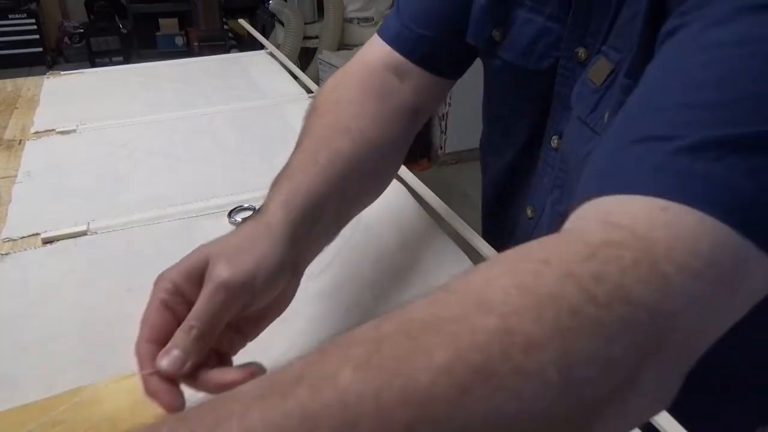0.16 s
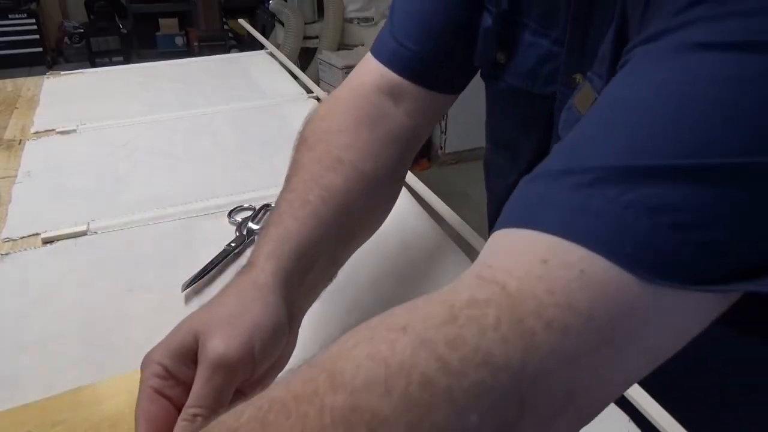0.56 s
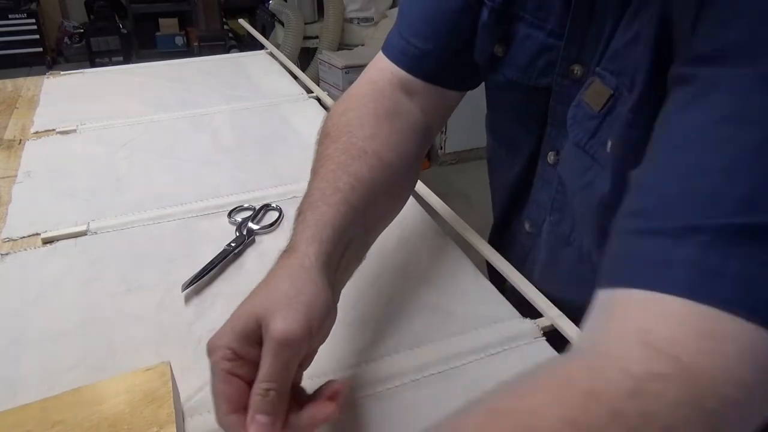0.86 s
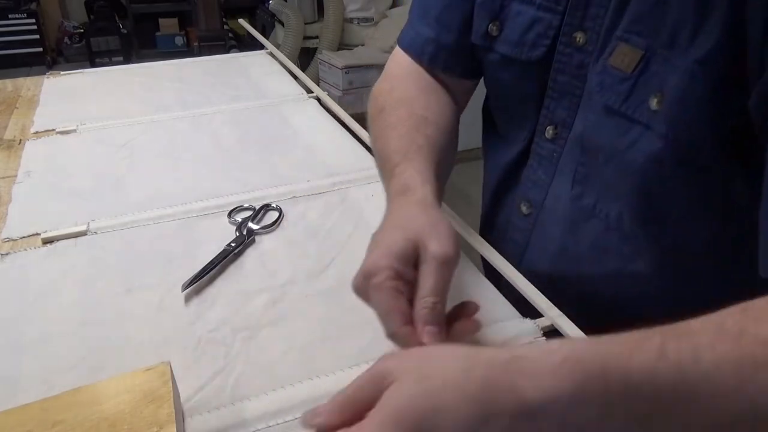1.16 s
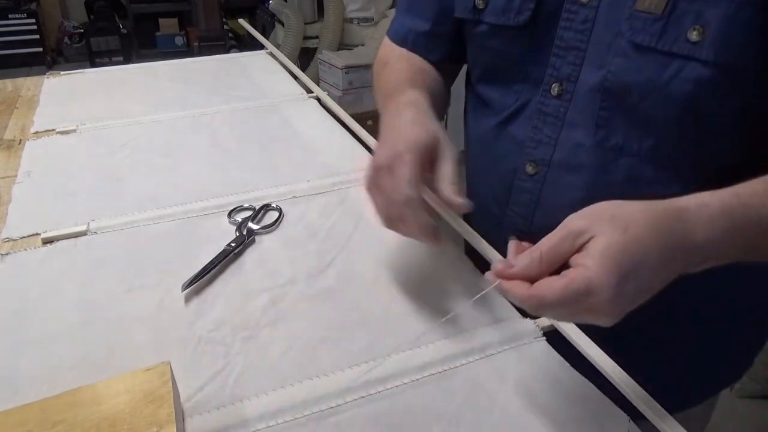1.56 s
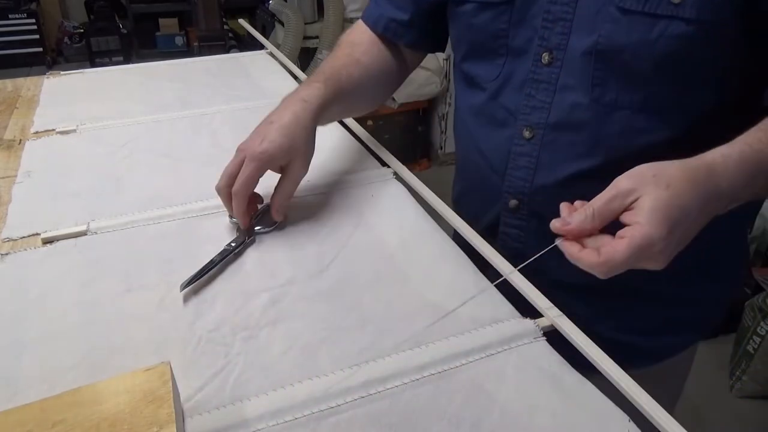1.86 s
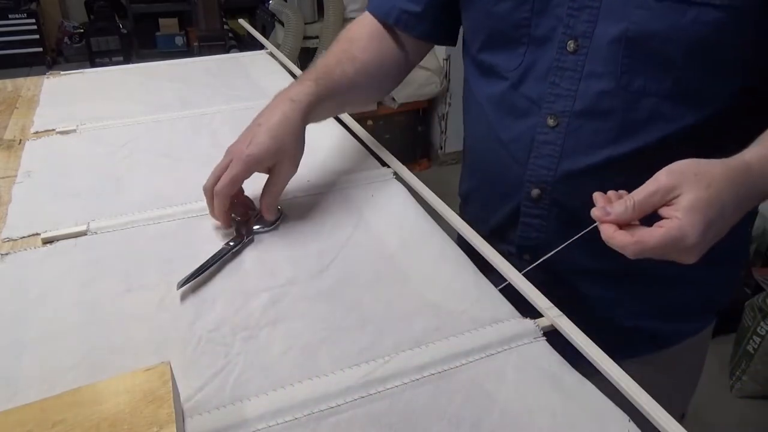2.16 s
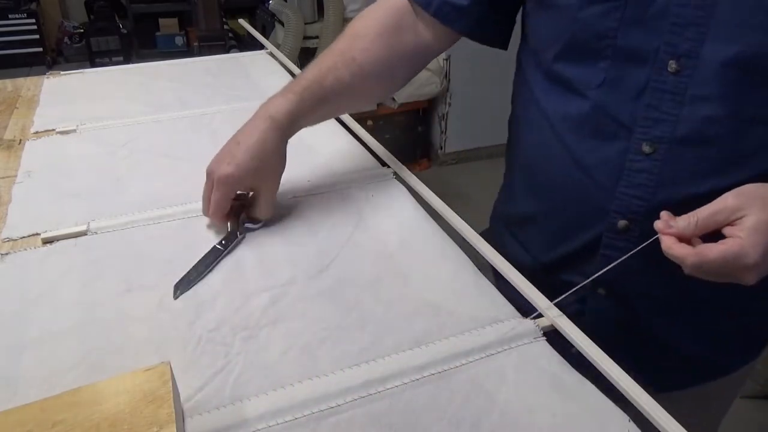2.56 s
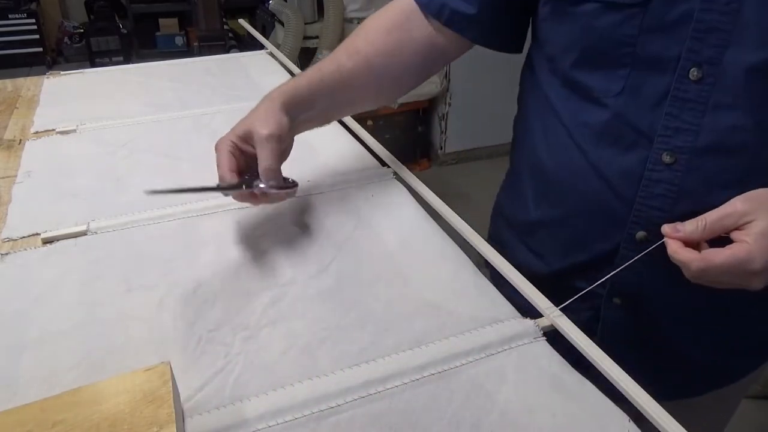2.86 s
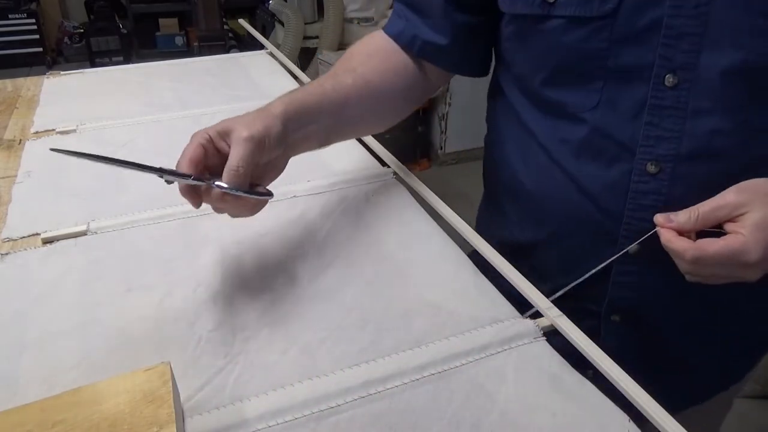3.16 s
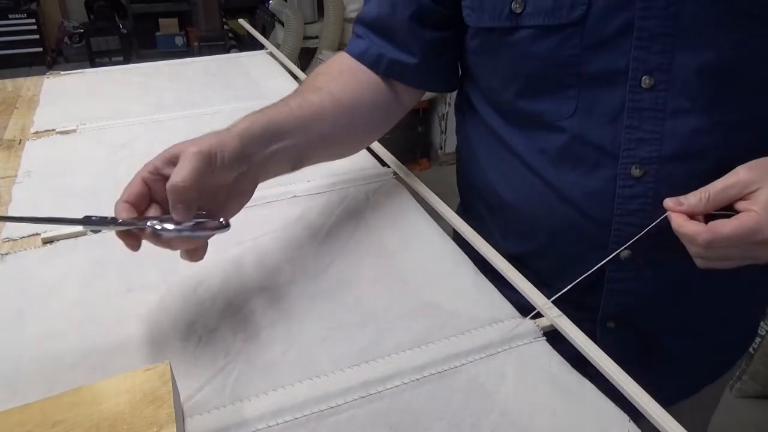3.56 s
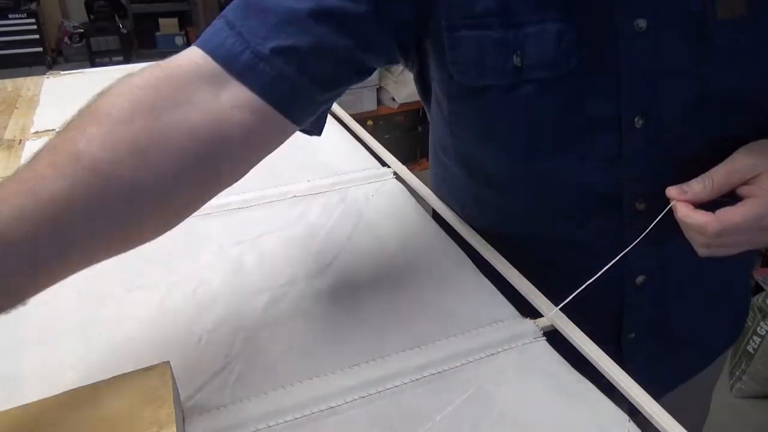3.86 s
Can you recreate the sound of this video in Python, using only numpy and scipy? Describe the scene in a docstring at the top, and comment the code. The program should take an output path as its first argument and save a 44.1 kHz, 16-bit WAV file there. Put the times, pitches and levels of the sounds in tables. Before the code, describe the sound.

Close hand sewing on tightly stretched cloth: thread hisses and rasps, fingers tap the drumlike surface, and scissors clink once.

```python
"""A quiet workshop, with a stereo microphone close to fabric stretched drum-tight over a wooden frame.
Someone is sewing by hand: thread hisses through the weave, ticks where it catches and rasps when pulled.
Fingers and thread bump and rub the taut skin of cloth, which booms like a loose drum.
A sleeve rustles and steel scissors clink as they are picked up.
Faint room noise and a thin electronic buzz lie underneath."""
import sys
import numpy as np
from scipy import signal
from scipy.fft import rfft, irfft
from scipy.io import wavfile

SR = 44100
rng = np.random.default_rng(int(sys.argv[2]) if len(sys.argv) > 2 else 0)


def unload_audio(sound):
    """Save the sound as a 16-bit wav file, at the path given as the first command line argument."""
    columns = np.transpose(np.atleast_2d(sound))
    # keep every value between -1 and 1, then stretch to whole-number steps
    steps = np.round(np.clip(columns, -1, 1) * 32767)
    wavfile.write(sys.argv[1], SR, steps.astype(np.int16))


N = 177590
TIME = np.arange(N) / SR
FREQS = np.maximum(np.arange(N + 1) * SR / (2 * N), 1)

# Fingers and thread bumping the skin. Each row: start in seconds, relative level in dB, contact resonance
# in Hz, contact damping from 0 to 1, crack level in dB, ring against the first wave in dB.
BUMPS = [(0.381, -43.5, 1030, 0.4, -50, 13), (0.386, -38, 440, 0.66, -77, 6.5),
         (0.48, -50, 450, 0.5, -60, 15), (0.6900, -35.5, 769, 0.01, -40.5, 7),
         (0.6912, -26.5, 286, 0.2, -55, -9), (0.715, -22.5, 1184, 0.05, -36, -2),
         (0.718, -30, 2420, 0.06, -65, 0), (0.7245, -24, 584, 0.55, -69, -4.5),
         (0.727, -26, 1680, 0.2, -52, -3), (0.735, -25.5, 320, 0.3, -65, 2),
         (0.741, -23.5, 665, 0.27, -64, -1), (0.753, -22, 1064, 0.5, -69, -2),
         (0.802, -30.5, 1050, 0.7, -75, -2), (0.988, -35, 470, 0.3, -71, -9),
         (1.143, -38, 798, 0.26, -73, 1), (1.1938, -36, 1920, 0.4, -48, -10.5),
         (1.246, -42.5, 396.8, 0.16, -65, 1), (1.256, -46, 180, 0.32, -78, -0.5),
         (1.280, -32.5, 980, 0.2, -65, -4), (1.305, -35, 1000, 0.27, -61, -2),
         (1.419, -38, 1180, 0.41, -63, 3), (1.748, -49, 342, .44, -82.5, 1),
         (1.8415, -41.5, 1370, .44, -50, -1), (1.858, -44, 909.9, .44, -55, -3),
         (1.868, -43, 338, 0.3, -80, 4), (1.956, -31, 760, 0.38, -69, 4), (1.96, -39, 313, 0.16, -80, -0.5),
         (1.982, -40, 640.1, 0.06, -75, 5), (2.037, -52, 190, 0.55, -67.5, 5.5),
         (2.096, -26, 1280, 0.55, -42, 4), (2.119, -32, 633, 0.57, -90, 5),
         (2.3889, -34.5, 1091, 0.13, -81, 2.5), (2.579, -42.5, 199, 0.23, -76, -6.5),
         (2.580, -32, 517, 0.4, -73, -3), (2.585, -37.5, 805, 0.03, -78, -6),
         (2.621, -36.5, 440, 0.3, -74, -2.5), (2.655, -42, 392, 0.32, -80, -3),
         (2.958, -62.5, 736.9, 0.59, -65.5, 10.5), (3.338, -56.5, 915.7, .44, -81, -3),
         (3.945, -61, 1010, 0.19, -68, 0), (3.961, -59, 1420, 0.36, -66.5, -6)]
# Colour of the taut cloth. Each row: frequency in Hz, relative level in dB.
SKIN_COLOUR = [(30, -78.5), (115, -24), (155, -30), (200, -14), (230, -14), (275, -4), (400, -1.5),
               (620, 5), (770, -4.5), (930, 4), (1230, 0.5), (1850, -13.5), (2400, -10.5), (3100, -19),
               (15000, -50)]


def skin_bumps(scatter_db, low_share, delay_cycles, knee_hz):
    """A bump sends a wave over the skin, lows arriving last; returns from the frame build the ring."""
    out = np.zeros((2, N))
    rings = [rfft(skin_ring(t60=0.37, dense_t60=0.49, dense_db=-1), 2 * N) for _ in range(3)]
    # seams and hands scatter the wave within milliseconds
    scatters = [rfft(unit_energy(widen(white()) * decay(0.062)), 2 * N) for _ in range(3)]
    wave = rms_one(shape(SKIN_COLOUR))
    # above the knee, each frequency arrives delay_cycles of its own cycles late
    delay = np.exp(-2j * np.pi * delay_cycles * np.log(FREQS + knee_hz))
    for k, (s, db, contact_hz, damping, _, ring_db) in enumerate(BUMPS):
        # the finger is a mass on a spring that favours its own frequency; a light snap moves less bass
        contact = 1 / (1 - (FREQS / contact_hz) ** 2 + 1j * damping * FREQS / contact_hz)
        travel = contact * delay / (1 - 1j * low_share * contact_hz / FREQS) ** 2
        peak = np.abs(irfft(wave * travel)).max()
        returns = from_db(scatter_db) * wave * scatters[k % 3] + from_db(ring_db) * rings[k % 3]
        bump = irfft((wave + returns) * travel) / peak
        start = int(s * SR)
        out[:, start:] += from_db(db - 3.5) * bump[:, :N - start]
    return out


def skin_ring(t60, dense_t60, dense_db):
    """The skin rings in clear modes, struck differently at each spot, over a mass of crowded ones."""
    # Each row: frequency in Hz, relative level in dB.
    skin_modes = [(156, -9), (187, -8.5), (201, -3.5), (291, -2), (318, -2), (388, -4), (421, 0), (445, 1),
                  (468, 5.5), (512, 6), (564, -1.5), (615, 2), (660, 3), (845, -3.5), (906, 4), (960, -7),
                  (994, -9), (1035, -12), (1075, 1.5), (1117, 1.5), (1194, -2.5), (1264, 0), (1575, -9),
                  (1650, -8.5), (1725, -9.5), (2350, -14)]
    modes = np.zeros((2, N))
    for hz, db in skin_modes:
        strength = from_db(db + 1.5 * rng.standard_normal())
        modes[:, :SR] += strength * np.sin(2 * np.pi * (hz * TIME[:SR] + rng.random((2, 1))))
    clear = unit_energy(widen(modes * decay(t60)))
    dense = unit_energy(noise(SKIN_COLOUR) * decay(dense_t60))
    ring = (clear + from_db(dense_db) * dense) * (1 - np.exp(-TIME / 0.0011))
    # open on both sides, the cloth radiates no deep bass
    return unit_energy(signal.sosfilt(signal.butter(3, 140, "high", fs=SR, output="sos"), ring))


def contact_cracks(crack_t60, tail_db, tail_t60):
    """Nail and thread give each bump a short bright crack, which dies away in the room."""
    # Each row: frequency in Hz, relative level in dB.
    crack_colour = [(100, -49.5), (500, 19), (1500, 16.5), (3000, 10), (6000, 0), (9000, -2.5),
                    (15500, -20.5)]
    hits = clicks([(s, crack_db) for s, _, _, _, crack_db, _ in BUMPS])
    fade = decay(crack_t60) + from_db(tail_db) * decay(tail_t60)
    return convolve(hits, fade) * noise(crack_colour)


def thread_drag(split_hz, bright_hz, sing_db, sing_from_db):
    """Slips along the weave make the skin boom and rasp and the thread hiss; under a hard pull it sings."""
    # Hiss of the weave. Each row: frequency in Hz, relative level in dB.
    weave_colour = [(100, -35), (1500, -6.5), (3000, -0.5), (4500, 1), (7000, 1), (8500, 1.5), (10000, -.5),
                    (12000, -2), (14000, -3), (15500, -10)]
    # Resonances of the taut thread. Each row: frequency in Hz, width in Hz, relative level in dB.
    thread_modes = [(2460, 220, -8), (2560, 88, -1), (3920, 86, 1.5), (5820, 240, -6), (8200, 400, -18.5)]
    boom, rasp, hiss = pull_gains()
    jerks = slips(per_s=700, spread_db=2)
    body = travelling_ring(jerks[0], spot_change_s=0.1906)
    body += from_db(-4.5) * rms_one(filtered(jerks[0], shape(SKIN_COLOUR)))
    body = tension_waver(body, depth=0.011, per_s=7)
    low = filtered(body, 1 / (1 + (FREQS / split_hz) ** 8))
    # now and then a single fibre snags and lets go with a tiny scratch
    snags = np.abs(convolve(slips(per_s=70, spread_db=2)[0], decay(0.006)))
    rustle = jerks + white() * (from_db(2.5) + from_db(-13) * rms_one(snags))
    fibres = rms_one(widen(filtered(rustle, shape(weave_colour))))
    # a faster pull is brighter as well as louder
    top = filtered(fibres, 1 / (1 + (bright_hz / FREQS) ** 8))
    fibres += top * (np.sqrt(hiss / from_db(-40)) - 1)
    sing = rms_one(widen(filtered(rustle, resonances(thread_modes))))
    sing = tension_waver(sing, depth=0.02, per_s=6)
    sing /= 1 + (from_db(sing_from_db) / (rasp + 1e-9)) ** 2
    booming = from_db(-2.5) * boom * rms_one(low)
    rasping = rasp * (from_db(-0.1) * rms_one(body - low) + from_db(sing_db) * sing)
    return judder(depth_db=2, per_s=65) * (booming + rasping) + from_db(-2) * hiss * fibres


def pull_gains(taut_s=0.725, slack_s=2.18, attack_s=0.007, boom_lag_s=0.0035, boom_decay_s=0.0129):
    """Gains of boom, rasp and hiss: rasp and hiss follow the speed of each pull, the boom trails it."""
    # Pulls of the thread over the skin. Each row: fastest moment in seconds, length in seconds,
    # relative rasp level in dB, then the offsets of boom and hiss from it in dB.
    pulls = [(0.762, 0.094, -42.5, 1.5, -36), (0.83, 0.075, -52, 7, -10), (0.928, 0.081, -54, 7, -12),
             (1.011, 0.079, -47.5, 0, -5), (1.149, 0.043, -49, 2, -13), (1.189, 0.04, -55, 3, -4.5),
             (1.253, 0.053, -47, 5, -12), (1.301, 0.042, -46, 4, -21), (1.426, 0.061, -43.5, -2, -24),
             (1.606, 0.098, -43.5, -4, -14.5), (1.707, 0.049, -47.5, 0, -7.5),
             (1.763, 0.055, -56, 8.5, -10), (1.856, 0.025, -51.5, 2.5, -1.5),
             (1.924, 0.0277, -52.5, 5, -3.5), (1.958, 0.064, -45, 4, -29), (2.114, 0.09, -55.5, 8.5, -10),
             (2.384, 0.15, -54, 2.5, -15), (2.454, 0.04, -60, 10, -12), (2.523, 0.041, -66, 18, -8),
             (2.626, 0.073, -68.5, 22.5, -18)]
    # the thread snaps taut, then creeps on between pulls until it slackens
    creep = held(taut_s, slack_s, attack_s, release_s=0.46)
    boom_power, rasp_power, hiss_power = [(from_db(db) * creep) ** 2 for db in (-72, -67, -63.5)]
    for s, length, db, boom_db, hiss_db in pulls:
        speed = np.exp(-np.minimum(np.abs(2 * (TIME - s) / length) ** 1.25 / 2, 20))  # a pointed bell
        level = from_db(db) * speed
        boom_power += (level * from_db(boom_db)) ** 2
        rasp_power += level ** 2
        hiss_power += (level * from_db(hiss_db)) ** 2
    # the skin takes up a pull late and lets it go slowly
    late = np.interp(TIME - boom_lag_s, TIME, boom_power)
    pole = np.exp(-1 / (boom_decay_s * SR))
    boom_power = signal.lfilter([1 - pole], [1, -pole], late)
    taut = np.exp(np.minimum(TIME - taut_s, 0) / attack_s)
    return taut * np.sqrt([boom_power, rasp_power, hiss_power])


def slips(per_s, spread_db):
    """Fibres catch and let go at random, in jerks of uneven size."""
    sizes = from_db(spread_db * np.minimum(rng.exponential(1, (2, N)), 4))
    signs = rng.choice([-1, 1], (2, N))
    return rms_one(sizes * signs * (rng.random((2, N)) < per_s / SR))


def travelling_ring(jerks, spot_change_s):
    """The thread moves between two spots on the skin, so each mode swells and fades in its own time."""
    angle = np.pi / 2 * TIME / spot_change_s
    return sum(convolve(jerks * share, skin_ring(t60=0.41, dense_t60=0.21, dense_db=-3.5))
               for share in (np.cos(angle), np.sin(angle)))


def tension_waver(x, depth, per_s):
    """Pulling hands change the tension, so that all modes waver a little in pitch."""
    speed = depth * np.interp(TIME * per_s, np.arange(200), rng.standard_normal(200))
    place = np.arange(N) + np.cumsum(speed - speed.mean())
    return np.array([np.interp(place, np.arange(N), channel) for channel in x])


def judder(depth_db, per_s):
    """The thread grips and runs in turns, so that every pull is uneven."""
    knots = np.clip(rng.standard_normal(400), -1.5, 1.5)
    return rms_one(from_db(depth_db * np.interp(TIME * per_s, np.arange(400), knots)))


def thread_hiss(fade_s):
    """Thread runs through the cloth in countless tiny slips that merge into a fine, even hiss."""
    # Course of the draw. Each row: time in seconds, relative level in dB.
    draw = [(0.0, -61), (0.198, -60), (0.384, -66), (0.48, -70.5), (0.68, -71)]
    # Each row: frequency in Hz, relative level in dB.
    thread_colour = [(120, -53), (200, -17), (340, -14), (465, -7.5), (709, -7), (821, -6.5), (1840, -6),
                     (2910, -8), (4040, -6.5), (6520, -6.5), (9750, -11.5), (16000, -32)]
    times, db = np.transpose(draw)
    outside_s = np.maximum(np.maximum(times[0] - TIME, TIME - times[-1]), 0)
    level = from_db(np.interp(TIME, times, db) + 3) * np.exp(-(outside_s / fade_s) ** 2)
    return level * rms_one(widen(filtered(slips(per_s=19000, spread_db=3.5), shape(thread_colour))))


def thread_ticks():
    """The thread catches with dry ticks, a touch to the right of the other sewing sounds."""
    # Each row: start in seconds, relative level in dB.
    ticks = [(0.1728, -23.5), (0.2329, -17.5), (0.3477, -25), (0.9394, -29), (1.0272, -37.5),
             (3.8193, -39.5)]
    # Each row: frequency in Hz, relative level in dB, seconds to fall by 60 dB.
    tick_modes = [(1820, -12.5, 0.0038), (3500, -12.5, 0.0037), (4716, -6.5, 0.00228), (7240, -8, 0.001)]
    snap = sum((-1) ** k * from_db(db) * np.sin(2 * np.pi * hz * TIME) * decay(t60)
               for k, (hz, db, t60) in enumerate(tick_modes))
    snap = signal.sosfilt(signal.butter(2, [600, 8500], "band", fs=SR, output="sos"), snap)
    direct = convolve(clicks(ticks), from_db(-3) * snap)
    return workshop_reverb(direct, wet_db=-11.5, t60=0.11) * from_db([[-0.7], [0.7]])


def finger_scratches(t60, width_octaves):
    """Fingers scratch on thread and steel, each time with a brief puff of treble."""
    # Each row: start in seconds, level in dB, centre frequency in Hz.
    scratches = [(0.694, -50.5, 8700), (0.716, -50.5, 11000), (0.820, -63, 8000), (1.042, -52.5, 8250),
                 (1.064, -51, 7840), (1.069, -54.5, 7852), (1.244, -52, 10170), (1.2574, -58.5, 9500),
                 (1.356, -62, 11000), (1.697, -52, 10990), (1.849, -49, 11500), (1.915, -61, 12000),
                 (2.0984, -49, 10200), (3.559, -70, 10000), (3.573, -63, 9700), (3.818, -64, 8040),
                 (3.859, -67.5, 9000)]
    out = np.zeros((2, N))
    grit = widen(white())
    for s, db, hz in scratches:
        band = np.exp(-(np.log2(FREQS / hz) / width_octaves) ** 2 / 2)
        puff = from_db(db) * rms_one(filtered(grit, band))
        start = int(s * SR)
        out[:, start:] += puff[:, start:] * decay(t60)[:N - start]
    return out


def scissors():
    """The blades knock together: a rough steel chink, in which clear modes ring on."""
    # The one row: start in seconds, relative level in dB.
    clinks = [(2.5853, -27)]
    # Clear modes. Each row: frequency in Hz, relative level in dB, seconds to fall by 60 dB.
    steel_modes = [(2160, -15, .08), (3000, -16, .05), (3690, -16, .1), (4000, -17, .07), (4980, -14, .05),
                   (5880, -11, .07), (6448, -1, .06), (6470, -11, .15), (6826, -10, .04), (7122, -10, .16),
                   (7499, -13, .13), (7900, -12, .1), (8150, -14, .12), (9130, -2, .05), (9190, -13, .14),
                   (9378, -6, .08), (9780, -7, .12), (9986, -8, .12), (10130, -13, .14), (10470, -12, .15),
                   (10690, -15, .15), (11040, -16, .08), (13590, -7.5, .14), (13700, -18, .12),
                   (14050, -19, .18), (14230, -21, .18)]
    # Crowded, short-lived modes. Each row: frequency in Hz, relative level in dB.
    steel_colour = [(300, -36), (1000, -6.5), (2200, -14), (4000, -8.5), (5000, -12), (5800, 2),
                    (6600, 10.5), (7400, 1.5), (8500, -8.5), (9300, 13), (10200, -3.5), (11500, -9),
                    (12500, -15), (13600, -3), (15500, -34)]
    ring = sum(from_db(db) * np.sin(2 * np.pi * (hz * TIME + rng.random())) * decay(t60)
               for hz, db, t60 in steel_modes)
    chink = noise(steel_colour) * (decay(0.028) + from_db(-21) * decay(0.42))
    clear = workshop_reverb(ring, wet_db=-4, t60=0.28)
    return convolve(clicks(clinks), from_db(-17.5) * clear + from_db(-3.5) * chink)


def sleeve_and_grip(attack_s, sleeve_release_s, grip_release_s):
    """As the arm moves, fingers slide over the steel handles; the sleeve rustles and settles later."""
    # Grasping the scissors, turning them, shifting the grip, reaching out.
    # Each row: start in seconds, length in seconds, sleeve level in dB, grip level in dB.
    moves = [(2.5, 0.29, -63, -72), (3.28, 0.14, -79, -74), (3.599, .15, -100, -95),
             (3.826, 0.23, -78.5, -76)]
    # Sliding friction. Each row: frequency in Hz, relative level in dB.
    slide_colour = [(80, -23), (300, 2.5), (1000, 0), (3000, -3.5), (6000, -6), (8000, -9), (10000, -9.5),
                    (12000, -17.5), (16000, -31)]
    # Resonances of the handles. Each row: frequency in Hz, width in Hz, relative level in dB.
    handle_modes = [(5300, 690, 12), (6850, 240, 18.5), (7780, 210, 17)]
    sleeve, grip = np.zeros((2, N))
    for s, length, sleeve_db, grip_db in moves:
        sleeve += from_db(sleeve_db) * held(s, s + length, attack_s, sleeve_release_s)
        grip += from_db(grip_db) * held(s, s + length, attack_s, grip_release_s)
    rustle = sleeve * noise(slide_colour)
    return rustle + grip * rms_one(filtered(noise(slide_colour), resonances(handle_modes)))


def electronic_buzz(rate_hz, pulse_s, first_s):
    """Two thin tones pulse together, a little unevenly in strength."""
    # Each row: frequency in Hz, typical peak level in dB.
    buzz_tones = [(4066, -67.5), (3510, -75)]
    count, since_s = np.divmod(TIME - first_s, 1 / rate_hz)
    from_peak_s = since_s - 0.5 / rate_hz
    strength = from_db(1.5 * rng.standard_normal(200))[count.astype(int)]
    whine = sum(from_db(db) * np.cos(2 * np.pi * hz * from_peak_s) for hz, db in buzz_tones)
    return strength * whine * np.exp(-(from_peak_s / pulse_s) ** 2)


def room_tone(level_db):
    """The faint, steady noise of the workshop."""
    # Each row: frequency in Hz, relative level in dB.
    room_colour = [(15, -72), (25, -75), (64, -10.5), (114, -12.5), (145, -14), (384, -13.5), (427, -10.5),
                   (560, -15.5), (887, -8.5), (2160, -13.5), (4030, -12), (4740, -16.5), (7920, -14.5),
                   (8590, -19.5), (16000, -24.5)]
    return from_db(level_db) * noise(room_colour)


def workshop_reverb(x, wet_db, t60):
    """The direct sound reaches the microphone, followed by the diffuse tail of the room."""
    tail = noise([(100, -8.5), (1000, 4), (9000, -5), (16000, -24)])
    tail *= decay(t60) * (1 - np.exp(-TIME / 0.001))
    return x + from_db(wet_db) * convolve(x, unit_energy(tail))


def widen(pair):
    """Two unrelated signals become left and right, nearly alike in the bass."""
    # Each row: frequency in Hz, side against mid in dB.
    stereo_width = [(40, -28), (130, -68), (350, -22.5), (700, -14.5), (1400, -7.5), (5000, -8.5),
                    (13000, -15)]
    return pair[0] + filtered(pair[1], shape(stereo_width)) * np.array([[1], [-1]])


def white():
    """Two unrelated white noises."""
    return rng.standard_normal((2, N))


def noise(colour):
    """Stereo noise of a given colour, rms 1."""
    return rms_one(widen(filtered(white(), shape(colour))))


def clicks(rows):
    """One impulse for each row of (seconds, dB)."""
    out = np.zeros(N)
    for s, db in rows:
        out[int(s * SR)] += from_db(db)
    return out


def decay(t60):
    """Fall by 60 dB every t60 seconds."""
    return from_db(-60 * np.minimum(TIME / t60, 5))


def held(start, end, attack_s, release_s):
    """Swell up to the start, hold to the end, die away."""
    return np.exp(-np.maximum(start - TIME, 0) / attack_s - np.maximum(TIME - end, 0) / release_s)


def shape(points):
    """Gain at every frequency from (Hz, dB) points."""
    hz, db = np.transpose(points)
    return from_db(np.interp(np.log(FREQS), np.log(hz), db))


def resonances(modes):
    """Response of parallel resonances from rows of (Hz, width in Hz, dB)."""
    return sum(from_db(db) / (1 + 2j * (FREQS - hz) / width) for hz, width, db in modes)


def filtered(x, response):
    """Apply a frequency response."""
    return irfft(rfft(x, 2 * N) * response)[..., :N]


def convolve(x, response):
    """Apply an impulse response."""
    return filtered(x, rfft(response, 2 * N))


def from_db(db):
    """Decibels to gain."""
    return 10 ** (np.asarray(db) / 20)


def rms_one(x):
    """Scale to unit rms."""
    return x / np.sqrt(np.mean(x ** 2) + 1e-20)


def unit_energy(x):
    """Scale a response so that it passes noise at equal power."""
    return rms_one(x) / np.sqrt(N)


def scene():
    """The sewing sits close up and slightly to the left, the treble more so, over the quiet room."""
    # Each row: frequency in Hz, lift of the left side and cut of the right in dB.
    left_lean = [(200, 0), (700, .4), (2000, .9), (5000, 1.05), (10000, .45)]
    near = skin_bumps(scatter_db=-5.5, low_share=0.35, delay_cycles=4.3, knee_hz=281.5)
    near += thread_drag(split_hz=704, bright_hz=9540, sing_db=-13, sing_from_db=-55)
    near += contact_cracks(crack_t60=0.011, tail_db=-7.5, tail_t60=0.3)
    near += thread_hiss(fade_s=0.022) + thread_ticks()
    near += finger_scratches(t60=0.013, width_octaves=0.33)
    near += scissors()
    near += sleeve_and_grip(attack_s=0.038, sleeve_release_s=0.308, grip_release_s=0.067)
    background = electronic_buzz(rate_hz=29.98, pulse_s=0.00418, first_s=0.0083) + room_tone(-71.5)
    lean = shape(left_lean)
    return filtered(near, np.array([lean, 1 / lean])) + background


def record(dry):
    """The top is cut steeply."""
    cutoff_hz = 15800
    return filtered(dry, 1 / np.sqrt(1 + (FREQS / cutoff_hz) ** 160))


dry = scene()
out = record(dry)
unload_audio(out)
```